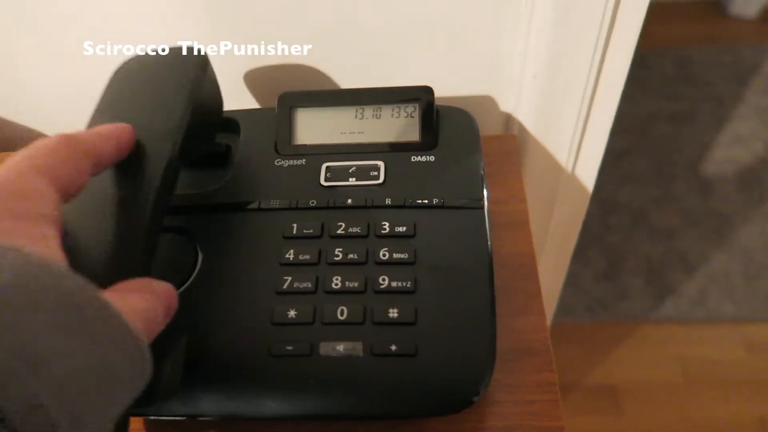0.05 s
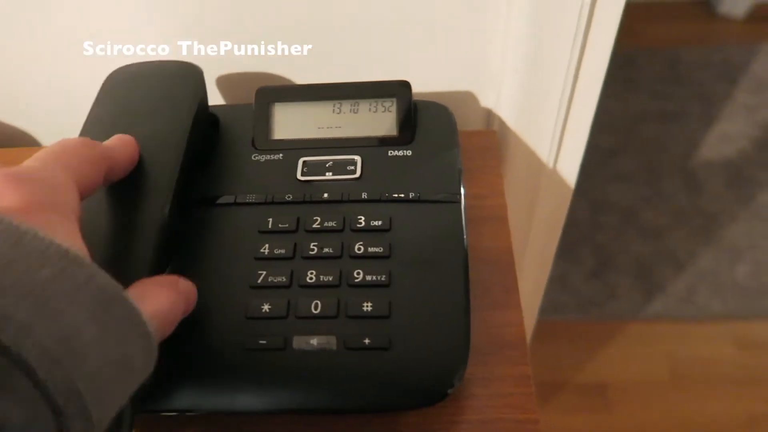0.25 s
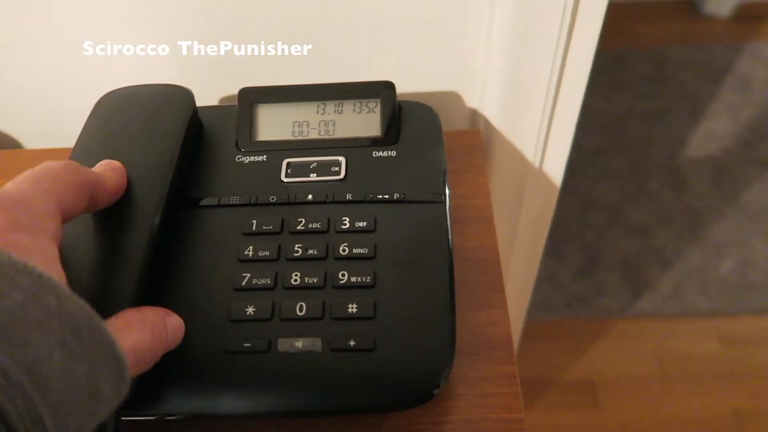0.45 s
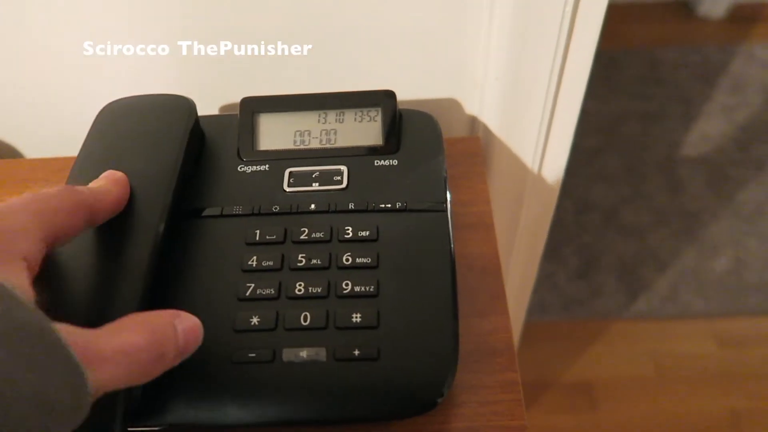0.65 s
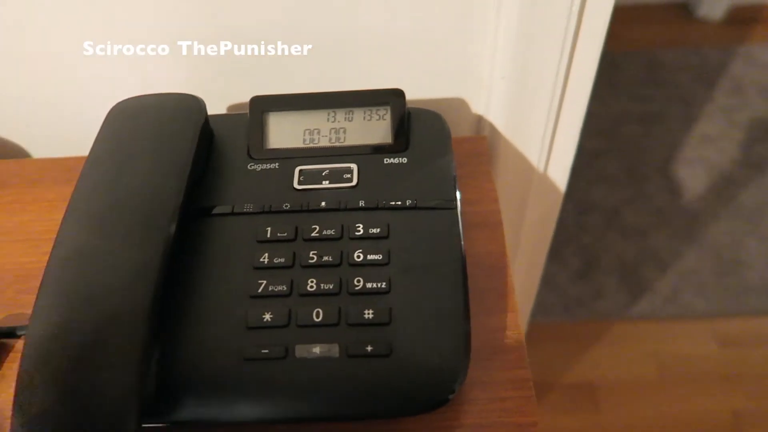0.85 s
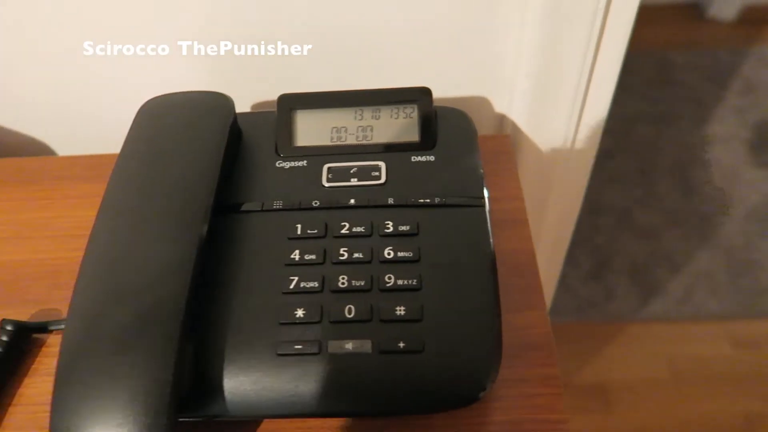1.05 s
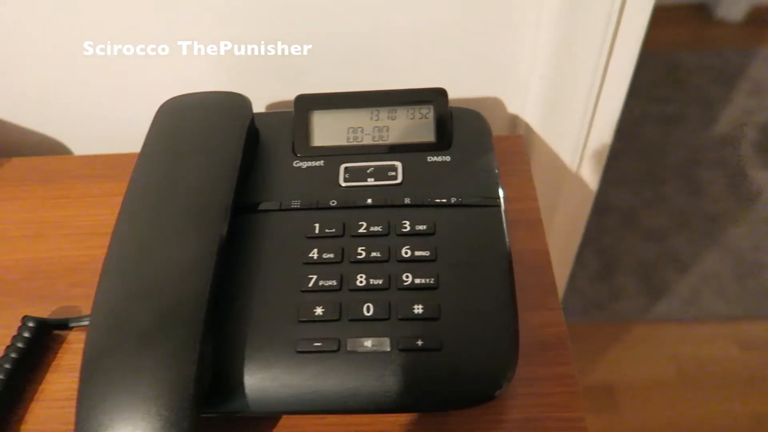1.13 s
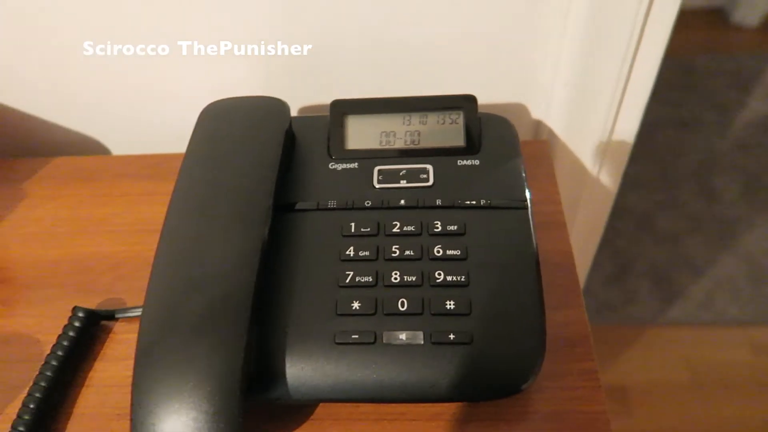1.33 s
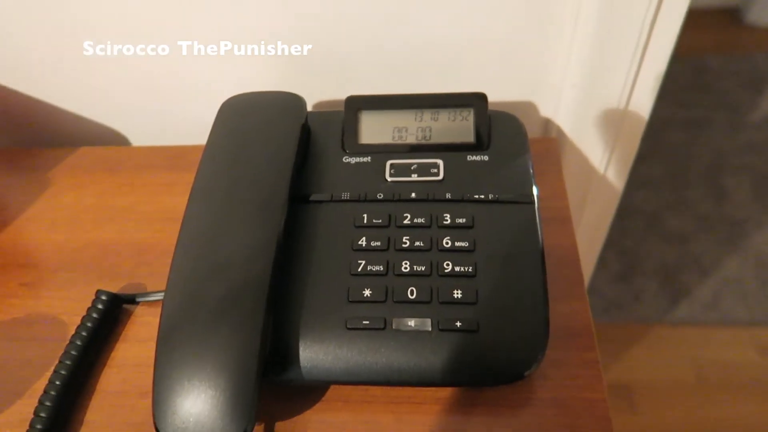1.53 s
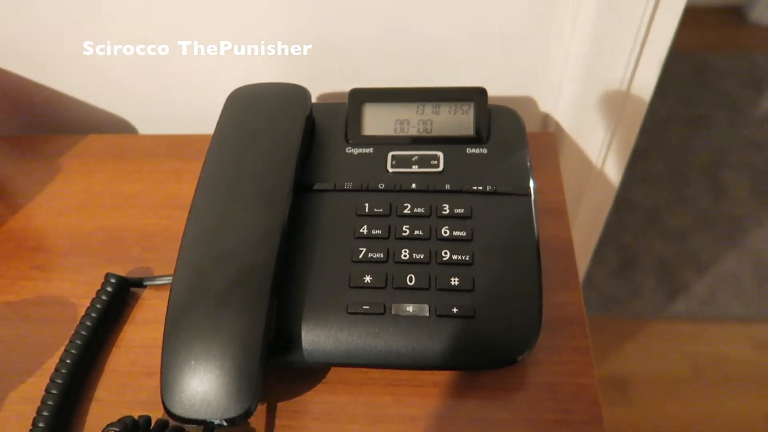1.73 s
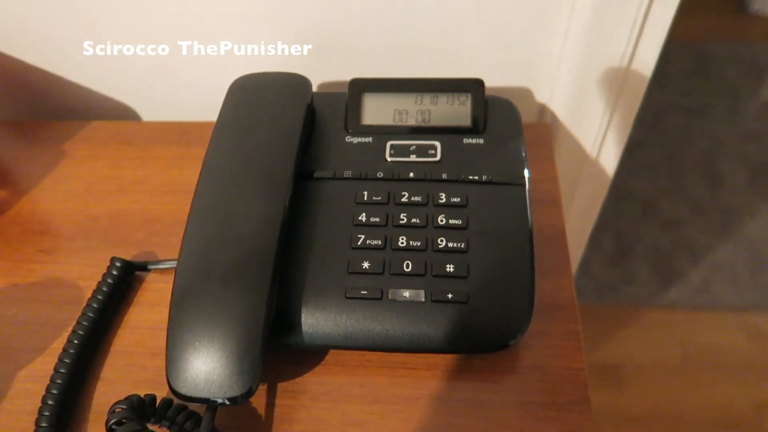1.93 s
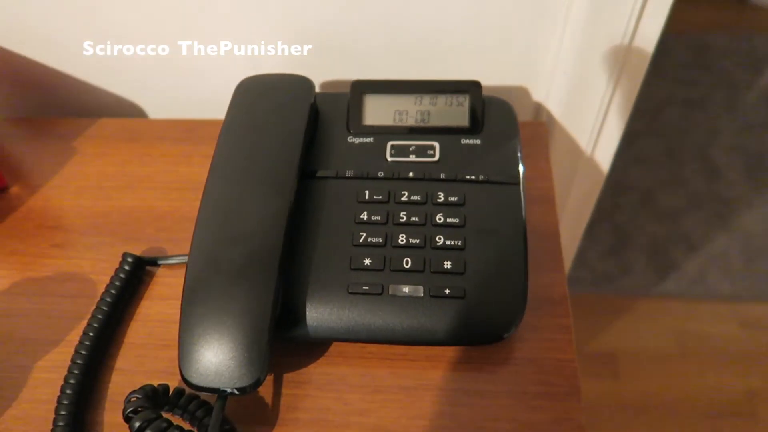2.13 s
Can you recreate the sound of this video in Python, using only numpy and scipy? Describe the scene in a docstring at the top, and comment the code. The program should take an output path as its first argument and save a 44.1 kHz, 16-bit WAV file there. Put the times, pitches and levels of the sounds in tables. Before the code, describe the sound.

Two close, hard plastic clacks as a desk phone is hung up, then quiet.

```python
"""A plastic telephone handset is put down on its cradle on a wooden table, close to the microphone.
One end knocks down and rattles, the other scrapes into its well and lands with a second clack.
Each contact thuds in the base, clacks in the shell and snaps at the edge; a few faint ticks follow.
A small room rings over rumble and hiss. The clacks overload the recorder: its gain ducks and creeps back."""
import sys
import numpy as np
from scipy import signal
from scipy.fft import rfft, irfft, next_fast_len
from scipy.io import wavfile
from scipy.ndimage import map_coordinates

SR = 44100
rng = np.random.default_rng(int(sys.argv[2]) if len(sys.argv) > 2 else 0)


def log_audio(samples):
    """Write samples as a 16-bit WAV file to the path given in sys.argv[1]."""
    # one column per channel
    frames = np.atleast_2d(samples).T
    # limit to full scale, then quantise
    limited = np.clip(frames, -1, 1)
    pcm = np.round(limited * 32767).astype(np.int16)
    wavfile.write(sys.argv[1], SR, pcm)


N = 97020
RING_SAMPLES, PUSH_SAMPLES = SR // 2, 2048


def amp(db):
    """Decibels to gain."""
    return 10 ** (np.asarray(db) / 20)


def unit_rms(x):
    """Scale to rms 1."""
    return x / np.sqrt(np.mean(x ** 2) + 1e-20)


def decay(t, t60):
    """Exponential decay, 60 dB in t60 seconds."""
    return np.exp(-np.log(1000) * t / t60)


def log_interp(points, hz):
    """Interpolate (f/Hz, value) points on a log frequency axis."""
    knots_hz, values = np.transpose(points)
    return np.interp(np.log(hz + 1), np.log(knots_hz + 1), values)


def filtered(x, response):
    """Zero-phase filter of gain response(hz)."""
    n = x.shape[-1]
    size = next_fast_len(n + SR // 4)
    return irfft(rfft(x, size) * response(np.fft.rfftfreq(size, 1 / SR)), size)[..., :n]


def coloured(x, colour):
    """Apply a (f/Hz, level/dB) curve."""
    return filtered(x, lambda hz: amp(log_interp(colour, hz)))


def stereo(mid, side, width):
    """Left and right from mid and side; width colours the side."""
    side = coloured(side, width)
    return np.array([mid + side, mid - side])


def add(track, start_s, x):
    """Mix x into the track."""
    i = round(start_s * SR)
    track[:, i:i + x.shape[1]] += x[:, :N - i]


def wobble(knots_per_s):
    """Smooth random curve."""
    return map_coordinates(rng.standard_normal(200), [np.arange(N) * knots_per_s / SR], mode="wrap")


def burst(t60):
    """Two independent decaying noises of unit energy."""
    x = rng.standard_normal((2, RING_SAMPLES)) * decay(np.arange(RING_SAMPLES) / SR, t60)
    return x / np.linalg.norm(x, axis=1, keepdims=True)


def push(drive, colour):
    """Convolve the drive with the shortest causal (minimum-phase) pulse of this colour."""
    hz = np.fft.rfftfreq(PUSH_SAMPLES, 1 / SR)
    cepstrum = irfft(np.log(amp(log_interp(colour, hz))))
    cepstrum[1:PUSH_SAMPLES // 2] *= 2
    cepstrum[PUSH_SAMPLES // 2 + 1:] = 0
    pulse = irfft(np.exp(rfft(cepstrum)))
    pulse *= np.sqrt(SR / 1000) / np.linalg.norm(pulse)  # energy of 1 ms at full scale
    return signal.fftconvolve(drive, pulse[None], axes=1)


def strike(colour, t60, buzz_db):
    """One contact: impulse plus dense buzz (buzz_db re the impulse) in the mid, buzz alone in the side."""
    drive = rng.standard_normal((2, PUSH_SAMPLES)) * decay(np.arange(PUSH_SAMPLES) / SR, t60)
    drive[0] *= amp(buzz_db) / np.linalg.norm(drive[0])
    drive[0, 0] += 1
    drive /= np.linalg.norm(drive, axis=1, keepdims=True)
    return push(drive, colour)


def resonate(contact, modes):
    """A contact plus the modes it excites; their levels vary from hit to hit."""
    t = np.arange(RING_SAMPLES) / SR
    rings = np.array([amp(db) * np.cos(2 * np.pi * hz * t) * decay(t, t60) for hz, db, t60 in modes])
    gains = 400 / SR * amp(rng.normal(0, 2.2, (len(modes), 1)))
    body = (gains * rings).sum(axis=0)
    body[0] += 1  # direct path
    return signal.fftconvolve(contact, body[None], axes=1)


# hum tones: f/Hz, level/dB re rumble, wander/Hz
HUM_TONES = [(131, -3.5, 6), (176.2, -9, 8)]


def hum(wavers_per_s=16, waver_db=4.5):
    """Low tones that waver in level and pitch."""
    out = np.zeros(N)
    for hz, db, wander_hz in HUM_TONES:
        level = amp(waver_db * wobble(wavers_per_s))
        phase = 2 * np.pi * np.cumsum(hz + wander_hz * wobble(wavers_per_s)) / SR
        out += amp(db) * unit_rms(level * np.sin(phase))
    return out


# noise spectra: f/Hz, level/dB
RUMBLE_COLOUR = [(20, -20.5), (38, -10), (58, 0.5), (88, -7.5), (108, -3), (130, -1.5), (155, -3),
                 (178, -2.5), (230, -4), (300, -15.5), (450, -26), (1000, -63.5)]
HISS_COLOUR = [(200, -8), (330, -2.5), (550, -6.5), (1000, -14), (2000, -20.5), (4400, -27), (8000, -35.5),
               (12000, -40.5), (15500, -54)]
# noise envelopes: t/s, level/dB
RUMBLE_LEVEL = [(0, -45), (0.499, -41.5), (.9, -37), (1.35, -37), (1.75, -39), (2.0, -43), (2.2, -45)]
HISS_LEVEL = [(0, -51), (.9, -52), (1.5, -51.5), (2.0, -51), (2.2, -51.5)]
# rumble width: f/Hz, side gain/dB
RUMBLE_WIDTH = [(50, -24.5), (130, -17.5), (300, -9)]


def background(hiss_side_db=2, flutter_db=0.5):
    """Room rumble and hum swell slowly, with a faint, wide hiss."""
    t = np.arange(N) / SR
    swell = amp(np.interp(t, *np.transpose(RUMBLE_LEVEL)))
    rumble = stereo(*coloured(rng.standard_normal((2, N)), RUMBLE_COLOUR), RUMBLE_WIDTH)
    hiss = stereo(*coloured(rng.standard_normal((2, N)), HISS_COLOUR), [(1000, hiss_side_db)])
    hiss_db = np.interp(t, *np.transpose(HISS_LEVEL)) + flutter_db * wobble(knots_per_s=22)
    return swell * (unit_rms(rumble) + hum()) + amp(hiss_db) * unit_rms(hiss)


# room decay: f/Hz, t60/s
ROOM_T60 = [(150, .5), (500, 0.58), (1500, 0.37), (3500, 0.35), (7000, 0.31), (10000, .29), (14000, 0.19)]
# room spectrum: f/Hz, level/dB
ROOM_COLOUR = [(100, 1), (300, 4), (600, -4.5), (1000, -2), (1900, -1.5), (3500, 0), (6500, -2), (8500, 0),
               (11000, -3), (14000, -8)]
# room width: f/Hz, side gain/dB
ROOM_WIDTH = [(100, -12), (700, -18), (2500, -15), (6000, -5.5), (11000, 4)]


def room(x, tail_db=-17.5, early_db=-15.5, delay_s=0.007):
    """The near wall and table reflect quickly; the room dies away more slowly."""
    hz, t, spectra = signal.stft(rng.standard_normal((2, RING_SAMPLES)), SR, nperseg=256)
    spectra *= decay(t, log_interp(ROOM_T60, hz)[:, None])
    tail = signal.istft(spectra, SR, nperseg=256)[1][:, :RING_SAMPLES]
    response = amp(tail_db) * tail / np.linalg.norm(tail[0]) + amp(early_db) * burst(t60=0.085)
    delayed = np.pad(x, (round(delay_s * SR), 0))
    reverb = signal.fftconvolve(delayed[None], response, axes=1)[:, :N]
    return stereo(*coloured(reverb, ROOM_COLOUR), ROOM_WIDTH)


# tick spectrum: f/Hz, level/dB
TICK_COLOUR = [(200, -12), (650, 2.5), (940, 4), (1300, -4), (2200, -9.5), (3200, -2), (3900, -11),
               (4700, -10), (8000, -16), (15000, -27.5)]
# lightly touched shell: f/Hz, level/dB, t60/s
TICK_MODES = [(930, -6.5, .08), (1950, -15, .06), (3202, -2, .055)]
# settling plastic: t/s, level/dB, low edge/Hz, high edge/Hz
TICKS = [(0.181, -45, 1607, 9000), (0.757, -37, 1398, 2686), (0.759, -43.5, 2990, 10860),
         (1.4292, -34.5, 699.5, 4992), (1.434, -32.5, 650, 1064), (1.4415, -37, 600, 4465),
         (1.483, -32.5, 1800, 2050), (1.641, -46, 1504, 5500)]


def ticks():
    """The plastic shifts; each tick rings the shell briefly in its own band."""
    out = np.zeros((2, N))
    for start_s, db, low_hz, high_hz in TICKS:
        band = signal.butter(2, [low_hz, high_hz], "bandpass", fs=SR, output="sos")
        tick = resonate(strike(TICK_COLOUR, t60=0.031, buzz_db=1.5), TICK_MODES)
        add(out, start_s, amp(db) * signal.sosfilt(band, tick))
    return out


SCRAPE_START_S, SCRAPE_FULL_S, SCRAPE_END_S = 0.3349, 0.356, 0.372
# scrape spectrum: f/Hz, level/dB
SCRAPE_COLOUR = [(150, -12.5), (280, -12.5), (450, 3.5), (750, -4), (1200, -7), (1600, -2.5), (2100, 2),
                 (2700, -6.5), (3200, -10.5), (5500, -18.5), (9000, -31), (15000, -48)]


def scrape(full_db=-8.5, rise_db=29.5, slips_per_s=8200):
    """Plastic slides on plastic in tiny slips until the handset is seated in its well."""
    t = np.arange(N) / SR
    slips = rng.standard_normal((2, N)) * (rng.random(N) < slips_per_s / SR)
    level = amp(full_db + np.interp(t, [SCRAPE_START_S, SCRAPE_FULL_S], [-rise_db, 0]))
    sliding = (t > SCRAPE_START_S) & (t < SCRAPE_END_S)
    return level * sliding * unit_rms(coloured(slips, SCRAPE_COLOUR))


# hollow base spectrum: f/pitch, level/dB
THUD_COLOUR = [(.1, -45.5), (.3, -29.5), (.55, -9.5), (.72, -9), (1, 0), (1.15, -2.5), (1.4, -10),
               (1.95, -3.5), (2.6, -14.5), (3.2, -14.5), (5, -28.5), (14, -58.5)]
# shell, edge and table top spectra: f/Hz, level/dB
CLACK_COLOUR = [(200, -43.5), (900, -24.5), (1450, 1.5), (1800, -12), (2200, 0), (2600, 1), (2980, 1.5),
                (3300, -5.5), (3750, -2.5), (5000, -7.5), (5850, -7.5), (7500, -21.5), (15000, -34.5)]
SNAP_COLOUR = [(1000, -29), (4000, -2), (6500, 0), (8800, -15), (11300, -8), (12800, -19), (15000, -20),
               (16000, -24)]
TABLE_COLOUR = [(25, -44.5), (50, -25), (90, -15.5), (128, 10), (165, -1), (230, -1), (600, -53)]
# modes of handset, cradle and table: f/Hz, first-end level/dB, second-end level/dB, t60/s
BODY_MODES = [(272, -16.5, -18, .16), (336.6, -25, -26, .7), (555, -25, -36, .11), (643, -19.5, -36.5, .16),
              (728, -42.5, -19, .1), (958, -15.5, -20, .06), (1050, -22.5, -29, .16),
              (1220, -9.5, -24.5, .03), (1476, -11.5, -11, .035), (1730, -17.5, -23, 0.18),
              (2068, -10, -8, .07), (2200, -12, -20.5, .08), (2980, -11, -11.5, .08),
              (3755, -10, -16.5, .05), (5850, -9, -7, .08)]
# handset on cradle: t/s, thud/dB, clack/dB, snap/dB, thud pitch/Hz, cutoff/Hz
CONTACTS = [(0.204, -40, -44, -36, 583, 7000), (0.2104, -30, -7.5, -14.5, 577.7, 5990),
            (0.2121, -28.5, -6.5, -14, 584.5, 5980), (0.2133, -20.5, 0, -10.5, 586.6, 12990),
            (0.2138, 14.5, 3.5, -26, 595.4, 5500), (0.2217, -11, -7, -29, 330, 2983),
            (0.2286, -7, -11.5, -27.5, 620, 4500), (0.2380, -12, -14.5, -34.5, 950, 2509),
            (0.2573, -13, -15, -33.5, 589.6, 3730), (0.2635, -17, -16.5, -36, 700, 2800),
            (0.3514, -8.5, -13.5, -31.5, 450, 3480), (0.3602, -23.5, -14, -34.5, 850, 3000),
            (0.3713, -17.5, 1, 1, 753.6, 17900), (0.3712, 13, -3.5, -15, 761.7, 6930),
            (0.3744, -15, -1, -5.5, 756, 8010), (0.3780, -1.5, -9.5, -17, 280, 8964),
            (0.392, -6, -8, -25, 751, 4033)]


def handset(table_re_thud_db=-25):
    """Each contact excites base, shell and edge; softer ones pass less treble. Thuds shake the table."""
    out, shakes = np.zeros((2, N)), np.zeros((2, N))
    first_end = [(hz, db, t60) for hz, db, _, t60 in BODY_MODES]
    second_end = [(hz, db, t60) for hz, _, db, t60 in BODY_MODES]
    for start_s, thud_db, clack_db, snap_db, pitch_hz, cutoff_hz in CONTACTS:
        thud_colour = [(ratio * pitch_hz, db) for ratio, db in THUD_COLOUR]
        thud = amp(thud_db) * strike(thud_colour, t60=0.092, buzz_db=-11.5)
        clack = amp(clack_db) * strike(CLACK_COLOUR, t60=0.017, buzz_db=6.5)
        snap = amp(snap_db) * strike(SNAP_COLOUR, t60=0.049, buzz_db=-0.5)
        lowpass = signal.butter(3, cutoff_hz, fs=SR, output="sos")
        contact = signal.sosfilt(lowpass, thud + clack + snap)
        modes = first_end if start_s < SCRAPE_START_S else second_end
        add(out, start_s, resonate(contact, modes))
        add(shakes, start_s, amp(thud_db + table_re_thud_db) * burst(t60=0.2))
    return out + push(shakes, TABLE_COLOUR)[:, :N]


# direct sound width: f/Hz, side gain/dB
DIRECT_WIDTH = [(100, -23.5), (300, -12.5), (700, -31.5), (1500, -20.5), (3000, -16), (6000, -8),
                (11000, -1.5)]


def scene():
    """The telephone close by, in its room."""
    mid, side = handset() + scrape() + ticks()
    return stereo(mid, side, DIRECT_WIDTH) + room(mid) + background()


THRESHOLD_DB, MAX_CUT_DB, ATTACK_S, RECOVER_DB_PER_S = -16, 11, 0.0016, 9
LOW_CUT_HZ, TOP_HZ = 6.9, 16000


def record(dry):
    """Gain control ducks fast and recovers slowly; soft clipping and band limits follow."""
    over_db = 20 * np.log10(np.abs(dry).max(axis=0) + 1e-9) - THRESHOLD_DB
    recovery_db = RECOVER_DB_PER_S * np.arange(N) / SR
    cut_db = np.maximum.accumulate(np.clip(over_db, 0, MAX_CUT_DB) + recovery_db) - recovery_db
    pole = np.exp(-1 / (ATTACK_S * SR))
    ducked = dry * amp(-signal.lfilter([1 - pole], [1, -pole], cut_db))
    clipped = ducked / (1 + np.abs(ducked) ** 6) ** (1 / 6)
    highpass = signal.butter(1, LOW_CUT_HZ, "highpass", fs=SR, output="sos")
    return filtered(signal.sosfilt(highpass, clipped), lambda hz: np.clip((TOP_HZ - hz) / 300, 0, 1))


dry = scene()
out = record(dry)
log_audio(out)
```